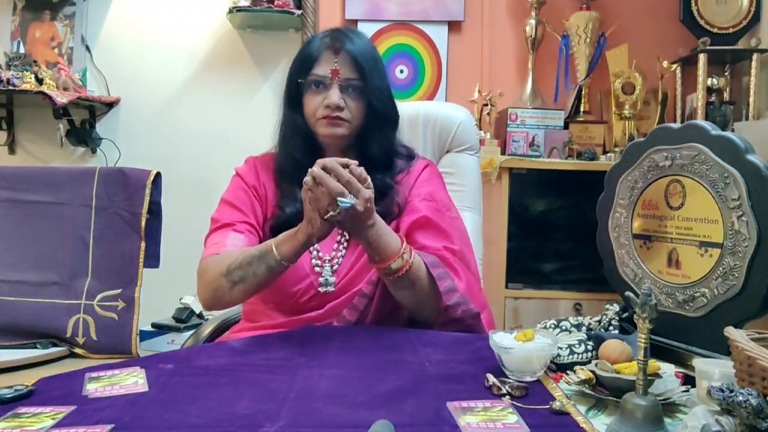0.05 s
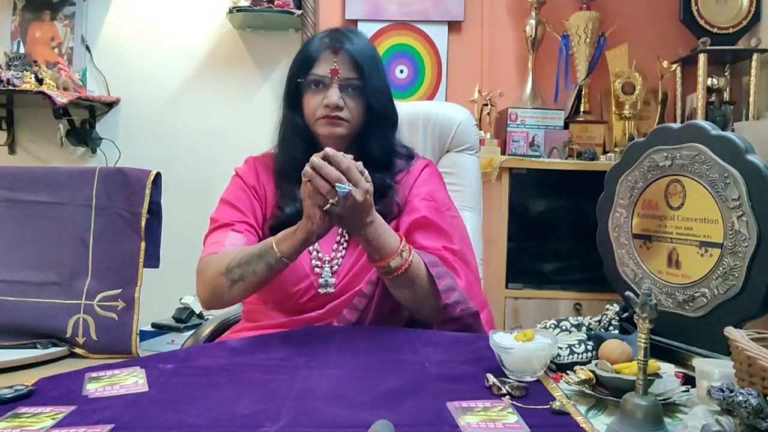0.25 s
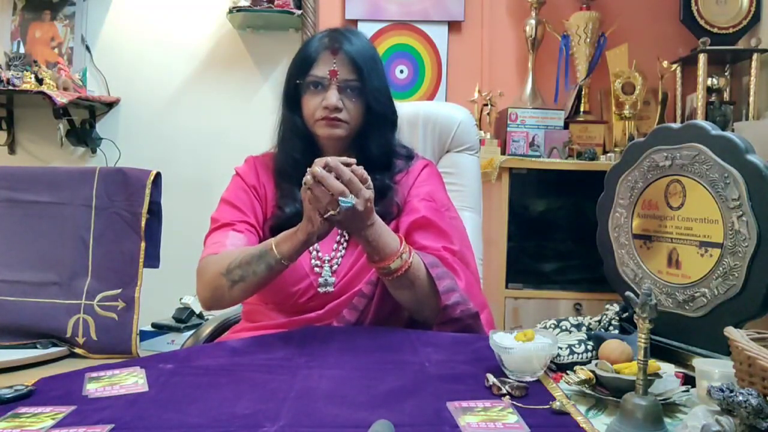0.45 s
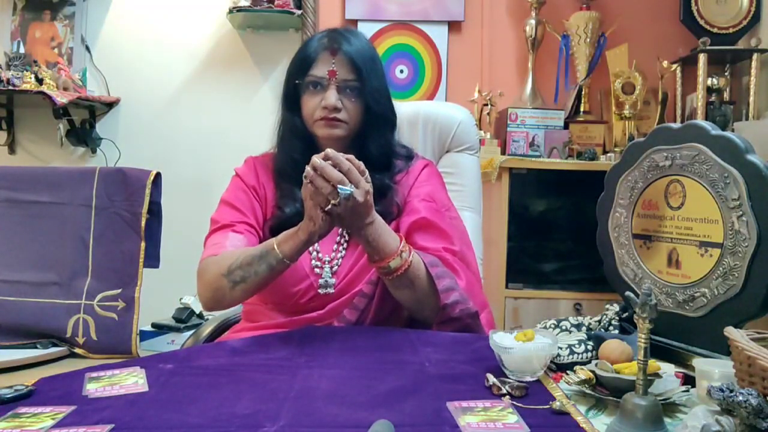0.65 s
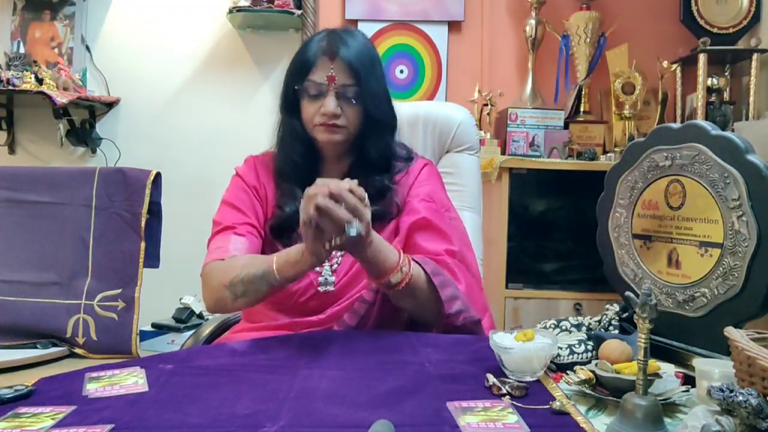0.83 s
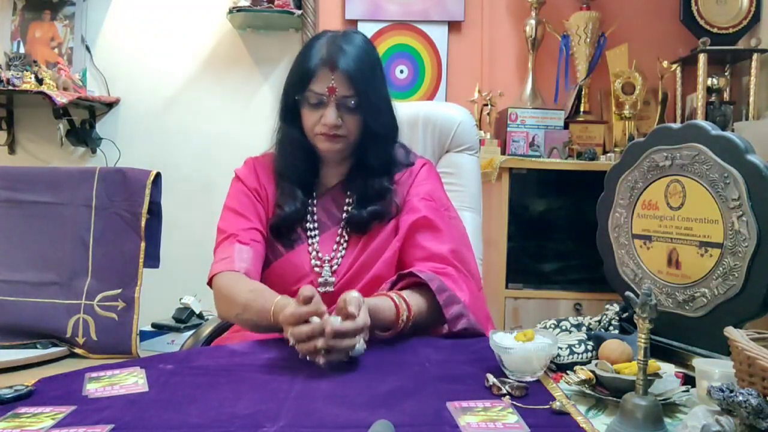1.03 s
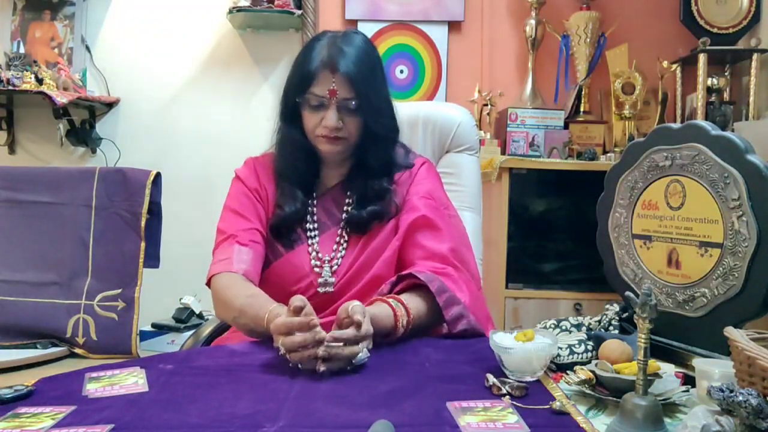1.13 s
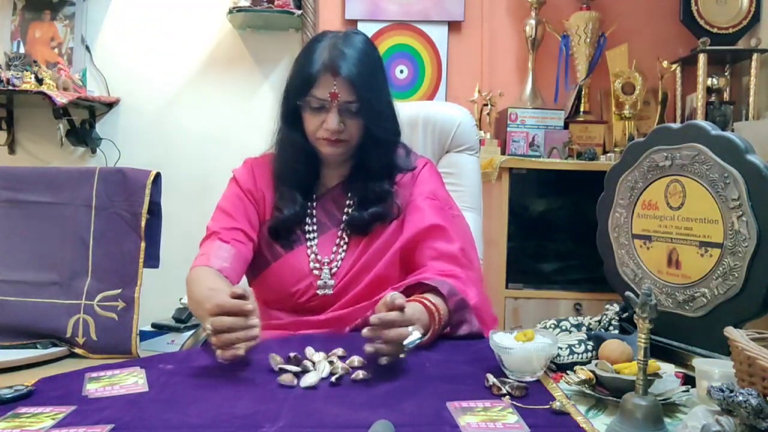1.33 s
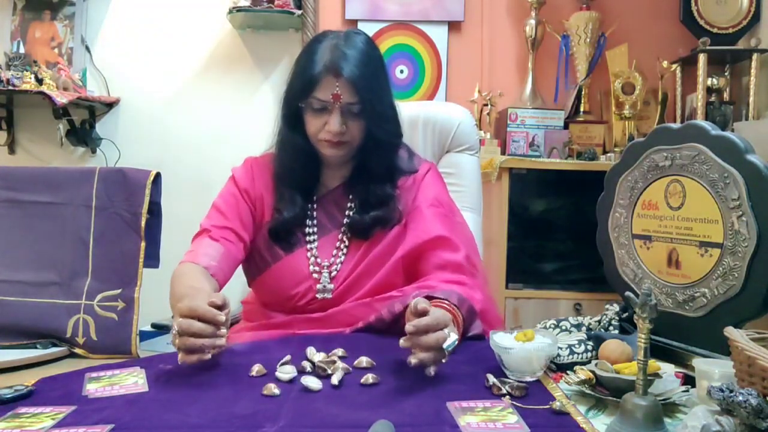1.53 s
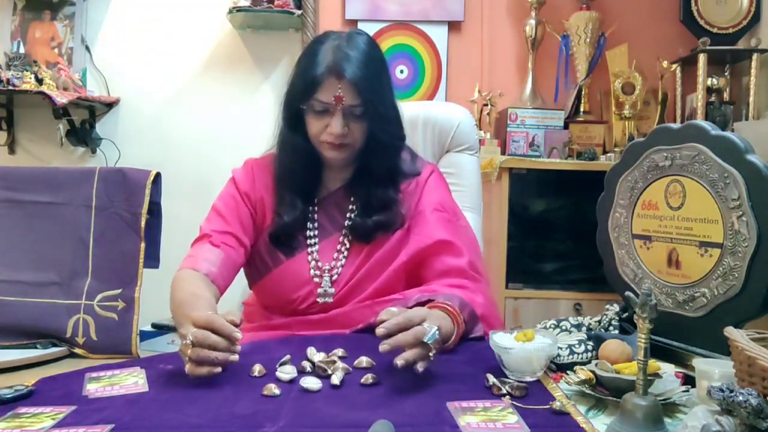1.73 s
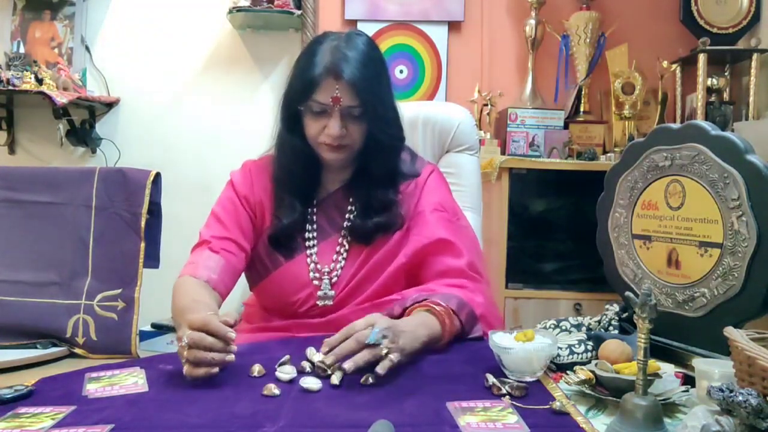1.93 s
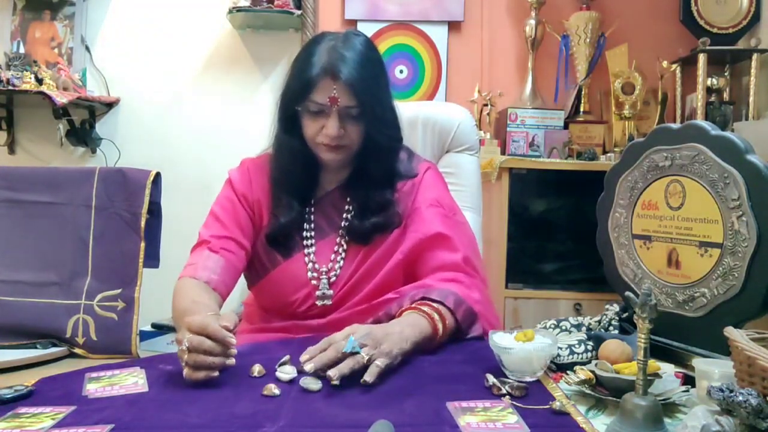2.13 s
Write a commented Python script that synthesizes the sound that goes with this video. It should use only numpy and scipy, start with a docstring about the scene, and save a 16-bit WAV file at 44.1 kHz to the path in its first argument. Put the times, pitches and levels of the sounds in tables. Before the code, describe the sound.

A handful of cowrie shells shaken fast, clicking brightly, then tossed onto a cloth-topped table, then quiet

```python
"""A handful of cowrie shells is shaken in cupped hands, some fifteen surges a second, in a small hard room.
The hands sink and open, and the shells spill onto a cloth-covered table, knocking it and each other.
Shell clicks are sums of short modes, thuds and knocks are puffs of noise, rubbing is filtered noise.
The microphone takes the direct sound, the room's echoes, a faint late echo, background air and a low hum."""
import sys
import numpy as np
from scipy import signal
from scipy.io import wavfile
from scipy.ndimage import uniform_filter1d

SR = 44100
rng = np.random.default_rng(int(sys.argv[2]) if len(sys.argv) > 2 else 0)


def unload_wav(signal):
    """Save mono or channel-first audio to the path in sys.argv[1] as 16-bit WAV at rate SR, clipped to [-1, 1]."""
    wavfile.write(
        sys.argv[1],
        SR,
        np.round(np.clip(np.atleast_2d(signal).T, -1, 1) * 32767).astype(np.int16),
    )


N = 96005
T = np.arange(N) / SR  # time (s)


def amp(db):
    """Turns decibels into gain."""
    return 10 ** (np.asarray(db) / 20)


def evened(x):
    """Scales to rms 1."""
    return x / np.sqrt(np.mean(x ** 2) + 1e-20)


def unit(x):
    """Scales to energy 1."""
    return x / np.linalg.norm(x)


def read(points, hz):
    """Reads a table on a log-frequency axis."""
    f, value = np.transpose(points)
    return np.interp(np.log(hz + 1), np.log(f), value)


def follow(points):
    """Reads a table of (time, value) along the whole scene."""
    return np.interp(T, *np.transpose(points))


def dying(t, t60):
    """Exponential decay that falls 60 dB in t60 seconds."""
    return np.exp(-np.log(1000) * t / t60)


def add(mix, s, sound):
    """Mixes a sound in at time s."""
    part = mix[max(round(s * SR), 0):][:len(sound)]
    part += sound[:len(part)]


def colour(x, points, size=4096):
    """Causal (minimum-phase) filter of energy 1, its spectrum shaped by a table."""
    hz = abs(np.fft.fftfreq(size, 1 / SR))
    log_gain = np.log(amp(read(points, hz)))
    response = np.exp(np.conj(signal.hilbert(log_gain)))
    taps = np.fft.ifft(response).real[:size // 2]
    return signal.fftconvolve(x, unit(taps))[:N]


# All level_db columns are relative; later gains and filters set the final level.
# Background of the room: pitch_hz, level_db (per Hz)
AIR_COLOUR = [(25, -23), (60, -0.5), (95, -9.5), (120, -1), (200, -9), (350, -8.5), (600, -16), (900, -19),
              (1200, -22.5), (1700, -19), (2300, -30), (4500, -36), (7400, -41), (8400, -46.5),
              (15500, -57)]
AIR_DB = -65.5  # rms


def air():
    """Steady filtered noise, the quiet background of the room."""
    return amp(AIR_DB) * evened(colour(rng.standard_normal(N), AIR_COLOUR))


def hum():
    """One faint, steady low sine."""
    hum_hz, peak_db = 59, -66
    return amp(peak_db) * np.sin(2 * np.pi * hum_hz * T)


SHELL_T60_S = .0055  # each mode lasts 0.5 to 1.5 times this
SHELL_RING = 1.63  # ringing against the contact tick


def shell(count=9, size=600):
    """One shell's click: a contact tick and a handful of quickly dying modes of its own."""
    t = np.arange(size) / SR
    place, phase, life, strength = rng.random((4, count, 1))
    band = np.arange(count)[:, None]
    hz = 1300 + 14000 * (band + place) / count  # one mode in each band
    modes = np.sin(2 * np.pi * (hz * t + phase)) * dying(t, SHELL_T60_S * (.5 + life))
    ring = ((0.23 + strength) * modes).sum(0)
    tick = t == 0
    return unit(tick + SHELL_RING * unit(ring))


CHATTER_S, CHATTER_KEEP = .001, .75  # mean spacing of the knock-ons, gain from each to the next


def clack(count=3, size=1200):
    """A hard collision is passed on to the neighbouring shells, weaker each time."""
    out = np.zeros(size)
    for k in range(count):
        jitter = (k > 0) * rng.uniform(-0.41, .5)
        add(out, (k + jitter) * CHATTER_S, CHATTER_KEEP ** k * shell(count=24))
    return unit(out)


# Each surge of the heap: crest_s, level_db, rise_s, fall_s
SURGE_CRESTS = [(.004, -23, .01, 0.0049), (.073, -26, 0.024, 0.0085), (.136, -29, 0.015, 0.015),
                (.197, -26.5, 0.018, 0.014), (0.282, -28.5, 0.013, 0.0065), (0.337, -26, 0.015, 0.014),
                (0.413, -30, 0.031, 0.0071), (.474, -27.5, 0.019, 0.01), (.535, -33, 0.03, 0.017),
                (.612, -32, 0.029, 0.017), (.675, -34, 0.044, 0.031), (0.73, -29, .009, 0.0096),
                (0.796, -31, 0.04, 0.0055), (.868, -32, 0.024, .025), (.935, -34, 0.023, 0.03),
                (1.067, -32, 0.042, 0.045), (1.112, -30.5, 0.0073, 0.0084), (1.226, -37, 0.012, 0.0088),
                (1.291, -34, 0.0098, 0.015), (1.358, -25.5, .013, 0.009), (1.404, -40, .012, 0.012)]
# Shells sliding about between the surges: time_s, level_db
JOSTLE_LEVEL = [(0, -32.5), (.5, -34.5), (.9, -32.5), (1.02, -41), (1.12, -43), (1.17, -50), (1.26, -40.5),
                (1.42, -37.5), (1.48, -63), (1.54, -90)]


def shaking():
    """Level of the heap in dB: the power of the jostling plus that of the bell-shaped surges."""
    power = amp(follow(JOSTLE_LEVEL)) ** 2
    for s, db, rise, fall in SURGE_CRESTS:
        width = np.where(T < s, rise, fall)
        power = power + amp(db) ** 2 * np.exp(-((T - s) / width) ** 2)
    return 10 * np.log10(power)


# Single hard clacks of shell on shell: start_s, level_db
HARD_CLACKS = [(0.0543, -9), (0.0644, -25), (0.1334, -7.5), (.1822, -18), (0.311, -10), (0.352, -9),
               (0.4516, -6), (.5842, -5), (0.6058, -1), (0.6084, -5.5), (.6230, -33), (0.721, 1.5),
               (0.727, -16), (0.741, -3.5), (0.7948, -5), (0.963, -10.5), (1.0736, -9), (1.1057, -19),
               (1.2150, -22), (1.3230, -6), (1.3264, -12), (1.3480, -11.5), (1.3548, -6), (1.356, -13.5),
               (1.36, -21), (1.3699, -3), (1.398, -18)]
HITS_PER_S, SIZE_SPREAD_DB = 1700, 0.5
CLICK_LOW_HZ = 1000  # low cut
# Harder shaking gives shorter contacts, so more treble
BRIGHT_HZ, BRIGHT_DB_PER_DB, USUAL_DB = 3780, 0.13, -20


def collisions(count=300):
    """Random clicks that follow the shaking, brighter when it is hard, and the single hard clacks."""
    level_db = shaking()
    spread_db = SIZE_SPREAD_DB * np.minimum(rng.exponential(1, N), 3)
    sizes = amp(spread_db) * rng.choice([-1, 1], N)
    hits = sizes * (rng.random(N) < HITS_PER_S / SR)
    # neighbouring hits share the heap's energy
    crowding = np.sqrt(abs(uniform_filter1d(hits ** 2, size=500)) + 1e-6)
    hits = hits * amp(level_db) / crowding

    rings = [shell() for _ in range(count)]
    which = rng.integers(0, count, N)
    clicks = np.zeros(N)
    for i in np.flatnonzero(hits):
        add(clicks, T[i], hits[i] * rings[which[i]])

    dull = signal.sosfiltfilt(signal.butter(2, BRIGHT_HZ, fs=SR, output="sos"), clicks)
    treble_db = BRIGHT_DB_PER_DB * np.clip(level_db - USUAL_DB, -10, 10)
    clicks = dull + (clicks - dull) * amp(treble_db)
    for s, db in HARD_CLACKS:
        add(clicks, s, amp(db) * clack())
    return signal.sosfilt(signal.butter(2, CLICK_LOW_HZ, "high", fs=SR, output="sos"), clicks)


def resonate(x, hz, width):
    """A resonance of gain 1 that follows the curve hz: shift to 0 Hz, smooth, shift back."""
    turn = np.exp(2j * np.pi * np.cumsum(hz) / SR)
    r = np.exp(-np.pi * width / SR)
    return 2 * (turn * signal.lfilter([1 - r], [1, -r], x / turn)).real


# Colour of the clicks in closed hands: pitch_hz, level_db (per Hz)
CUPPED_COLOUR = [(600, -35), (1150, -28), (1490, -7), (1750, -17), (2100, -11), (2520, -7.5), (3000, -11),
                 (3700, -12.5), (4400, -13.5), (5200, -7), (6200, -5), (7000, 0.5), (7600, -3), (7950, -9),
                 (9200, -10.5), (11000, -17), (13000, -21.5), (15500, -23.5)]
# The same in parting hands: pitch_hz, level_db (per Hz)
PARTED_COLOUR = [(600, -30.5), (1150, -21.5), (1500, -14), (2100, -12.5), (2560, -5), (3100, -5.5),
                 (3700, -10.5), (4600, -12), (5700, -2.5), (6300, -3.5), (7050, 2.5), (7600, -3),
                 (7950, -8), (9000, -9.5), (12000, -18), (15500, -26)]
# The same on the table: pitch_hz, level_db (per Hz)
SPILLED_COLOUR = [(600, -20.5), (1300, -10.5), (1600, -14), (2000, -13.5), (2650, -3.5), (3350, -6.5),
                  (4300, -22.5), (5700, -7), (6400, -5), (7080, 3), (7600, -5), (8000, -7), (8900, -10.5),
                  (11000, -15.5), (15500, -28)]
# Resonance of the space between the hands: time_s, pitch_hz
HOLLOW_PITCH = [(0.0, 2570), (0.184, 2520), (0.234, 2550), (0.466, 2830), (0.514, 2520), (0.73, 2640),
                (0.774, 2390), (1.088, 2470), (1.118, 2670), (1.3, 2460)]
HOLLOW_WIDTH_HZ, HOLLOW_GAIN = 130, .8
PART_S, SPILL_S, BLEND_S = 0.92, 1.287, 0.078  # middles of the two crossfades, and their length


def rattle():
    """The hands colour the clicks, first closed, then parting, until the shells spill out."""
    clicks = collisions()
    parted = np.clip((T - PART_S) / BLEND_S + .5, 0, 1)
    spilled = np.clip((T - SPILL_S) / BLEND_S + .5, 0, 1)
    held = colour(clicks * (1 - parted), CUPPED_COLOUR)
    held = held + colour(clicks * (parted - spilled), PARTED_COLOUR)
    hollow = resonate(held, follow(HOLLOW_PITCH), HOLLOW_WIDTH_HZ)
    return held + HOLLOW_GAIN * hollow + colour(clicks * spilled, SPILLED_COLOUR)


# Soft rubbing of palms, then shells rolling on cloth: time_s, level_db
RUB_LEVEL = [(0, -52), (.68, -52.5), (.8, -50.5), (1.0, -54), (1.26, -53), (1.34, -40), (1.44, -45.5),
             (1.49, -75), (1.58, -65.5)]
# Colour of the rubbing: pitch_hz, level_db (per Hz)
RUB_COLOUR = [(25, -15), (60, 4.5), (100, -2.5), (170, -0.5), (350, -3.5), (550, -9), (900, -7.5),
              (1300, -18.5), (3000, -27.5), (16000, -69)]


def rubbing():
    """Dull rustle of skin and cloth under the shells: filtered noise at a moving level."""
    return colour(rng.standard_normal(N), RUB_COLOUR) * amp(follow(RUB_LEVEL))


CLOTH_S = 0.0037  # a puff falls to 1/e in this time


def scuffs(rows, size=3000):
    """Soft contacts: short puffs of noise."""
    out = np.zeros(N)
    for s, db in rows:
        puff = rng.standard_normal(size) * np.exp(-T[:size] / CLOTH_S)
        add(out, s, amp(db) * unit(puff))
    return out


# The heap drops against the palms: start_s, level_db
KNOCKS = [(.703, -16), (.722, -20.5), (.757, -22), (.778, -21.5), (.828, -37)]
# Hollow colour of those knocks: pitch_hz, level_db (per Hz)
KNOCK_COLOUR = [(60, -20), (200, -7.5), (450, -0.5), (700, 3), (1150, -1), (1500, -23), (4000, -30),
                (16000, -59.5)]


def palm_knocks():
    """The heap knocks on the palms: puffs of noise with a hollow colour."""
    return colour(scuffs(KNOCKS), KNOCK_COLOUR)


# Shells landing on the cloth: start_s, level_db
CLOTH_LANDINGS = [(1.275, -15), (1.295, -27), (1.324, -14), (1.336, -8.5), (1.352, -16.5), (1.365, -13.5),
                  (1.370, -8), (1.388, -16.5), (1.405, -13), (1.424, -18), (1.447, -15.5), (1.460, -17),
                  (1.473, -18)]
# Colour of the thuds: pitch_hz, level_db (per Hz)
THUD_COLOUR = [(30, -22.5), (80, -18.5), (120, 9), (160, -1.5), (220, 6.5), (290, 12.5), (450, -0.5),
               (950, -1), (1200, -8), (1600, 2.5), (2000, -20), (3000, -14.5), (4200, -10.5), (16000, -53)]
# Modes of the table top: pitch_hz, level_db, t60_s
TOP_MODES = [(127, -14.5, 0.13), (217.4, -17, .1), (267, -31, 0.093), (342, -26.5, .07)]
TABLE_RING_DB = -22.5  # against the thuds


def table(size=12000):
    """Each landing is a short scuff, muffled by the cloth, that rings the table top."""
    t = T[:size]
    thuds = colour(scuffs(CLOTH_LANDINGS), THUD_COLOUR)
    top = np.zeros(size)
    for hz, db, t60 in TOP_MODES:
        top += amp(db) * np.cos(2 * np.pi * hz * t) * dying(t, t60)
    return thuds + amp(TABLE_RING_DB) * signal.fftconvolve(thuds, unit(top))[:N]


# Colour of skin on cloth: pitch_hz, level_db (per Hz)
SLIDE_COLOUR = [(100, -11), (500, -9), (1200, -5), (1700, 7), (2300, -9), (3500, -13), (5000, -21),
                (7000, -17), (8500, -29), (16000, -42)]
SLIDE_START_S, SLIDE_END_S, SLIDE_DB = 1.53, 1.9, -74


def sliding():
    """The hands draw back over the cloth: a soft swish of noise that swells and fades."""
    along = np.clip((T - SLIDE_START_S) / (SLIDE_END_S - SLIDE_START_S), 0, 1)
    swell = np.sin(np.pi * along ** .6)
    return amp(SLIDE_DB) * swell * colour(rng.standard_normal(N), SLIDE_COLOUR)


# The last shell tips over with two faint ticks: start_s, level_db
LAST_TICKS = [(1.5423, -33.5), (1.5507, -38)]
# Their drier colour: pitch_hz, level_db (per Hz)
TICK_COLOUR = [(800, -25), (2500, -6), (4000, 1), (5500, 3), (7200, 11), (8200, -11.5), (15000, -27)]


def settling():
    """Faint ticks after the spill, each a small clack of shell."""
    out = np.zeros(N)
    for s, db in LAST_TICKS:
        add(out, s, amp(db) * clack())
    return colour(out, TICK_COLOUR)


# Decay time of the small hard room: pitch_hz, t60_s
ROOM_DECAY = [(100, 0.15), (500, 0.63), (1500, 0.3), (3000, .3), (7000, 0.25), (14000, 0.29)]
ROOM_DB, EARLY_DB, EARLY_S = -4, -9, .012  # tail, near reflections, fade-in of the tail


def echoes(count=14, size=28000):
    """A few near reflections and a dense noise tail whose decay time depends on pitch."""
    hz, t, z = signal.stft(rng.standard_normal(size), SR, nperseg=256)
    fading = z * dying(t, read(ROOM_DECAY, hz)[:, None])
    tail = signal.istft(fading, SR)[1][:size]
    tail = amp(ROOM_DB) * unit(tail * np.minimum(T[:size] / EARLY_S, 1))
    times = rng.uniform(.1, 1.5, count) * EARLY_S
    for s, strength in zip(times, unit(rng.standard_normal(count))):
        add(tail, s, np.array([amp(EARLY_DB) * strength]))
    return tail


SWAY_S = 0.09234  # the hands move this long before the room answers differently


def room(x, count=5):
    """The echoes keep changing as the shells move: a cycle of crossfades between fixed patterns."""
    out = np.zeros(N)
    for k in range(count):
        away = abs((T / SWAY_S - k) % count - count / 2)
        share = np.cos(np.pi / 2 * np.minimum(away, 1))
        out += signal.fftconvolve(x * share, echoes())[:N]
    return out


# Colour of the lingering echo: pitch_hz, level_db
LATE_COLOUR = [(100, -5.5), (500, -7.5), (1200, -6), (1700, 8.5), (2400, -6.5), (5000, -24), (7000, -17),
               (9000, -28.5), (16000, -38)]
LATE_DB, LATE_T60_S = -23, .7


def lingering(x):
    """A faint, slower echo from the rest of the house: a decaying noise tail."""
    tail = rng.standard_normal(SR) * dying(T[:SR], LATE_T60_S)
    return amp(LATE_DB) * colour(signal.fftconvolve(x, unit(tail))[:N], LATE_COLOUR)


TABLE_ROOM_SHARE = 0.46  # the table top sends less into the room than the shells do


def scene():
    """Shells, hands and table in the room, over its quiet background and a low hum."""
    palms = rubbing() + palm_knocks()
    hands = amp(-2.8) * rattle() + amp(-2.5) * palms + settling() + sliding()
    thuds = amp(-3.0) * table()
    sent = hands + TABLE_ROOM_SHARE * thuds
    return (hands + thuds + room(sent) + lingering(sent) + air() + hum())[None]


def record(dry):
    """The recorder's band limit: a steep low-pass filter."""
    cutoff_hz = 15780
    taps = signal.firwin(511, cutoff_hz, window=("kaiser", 9), fs=SR)
    return signal.oaconvolve(dry, taps[None], "same")


dry = scene()
out = record(dry)
unload_wav(out)
```